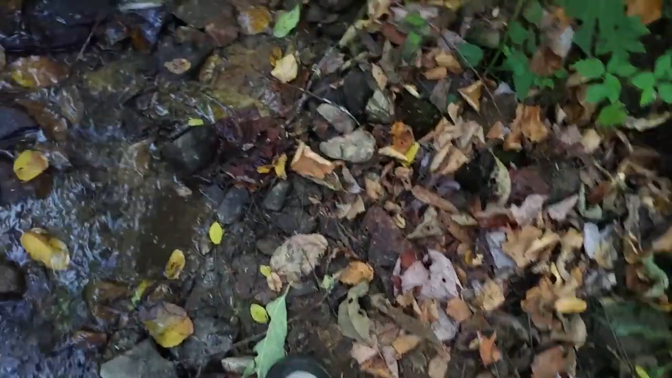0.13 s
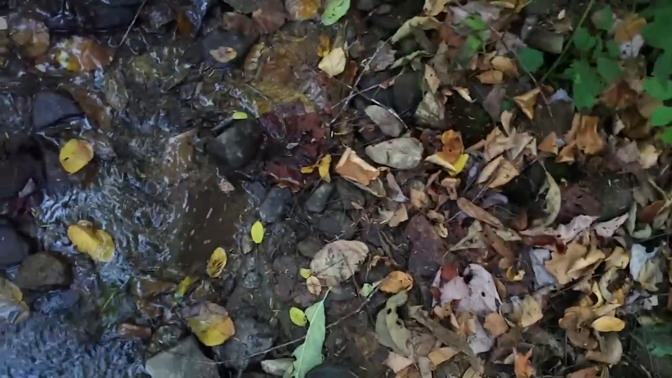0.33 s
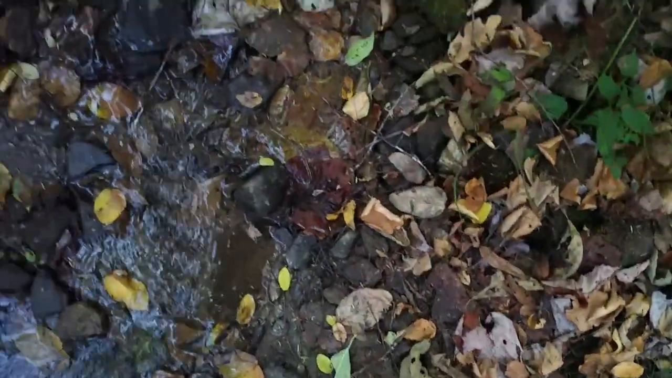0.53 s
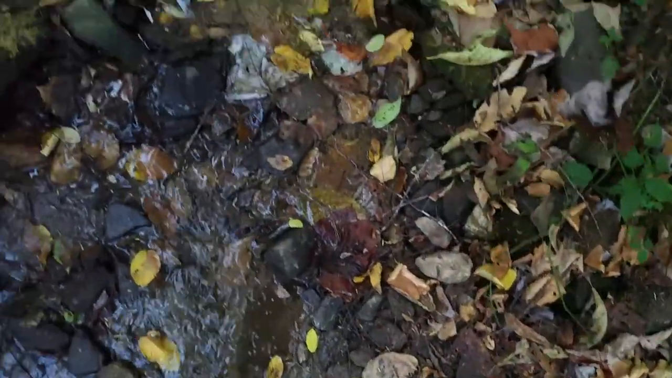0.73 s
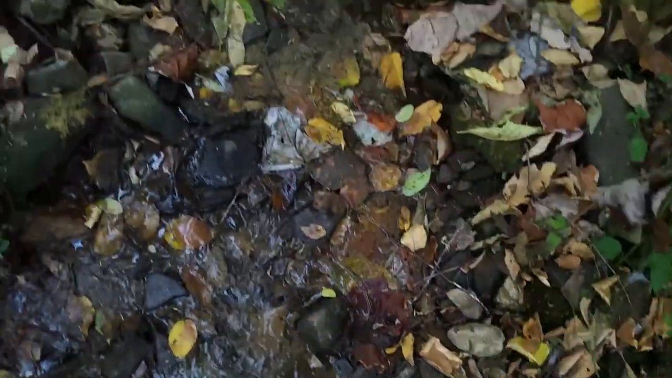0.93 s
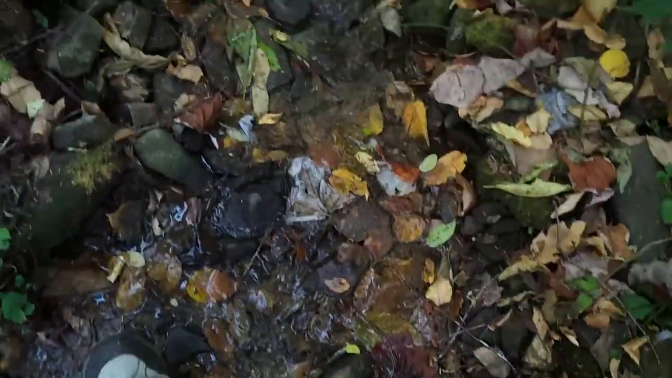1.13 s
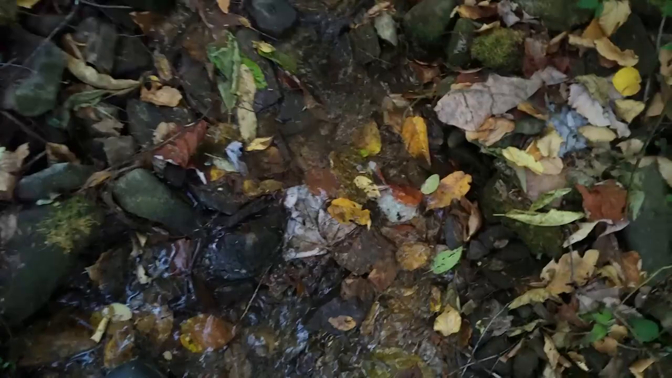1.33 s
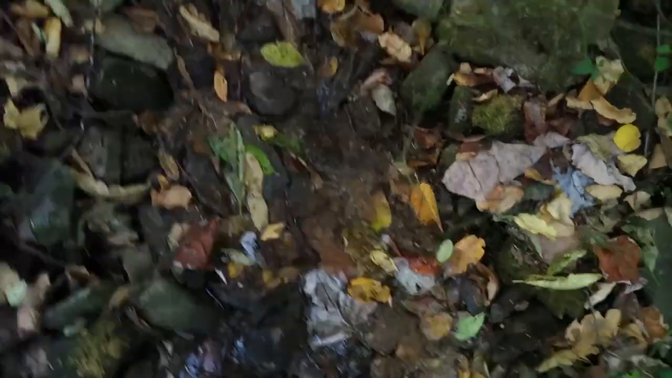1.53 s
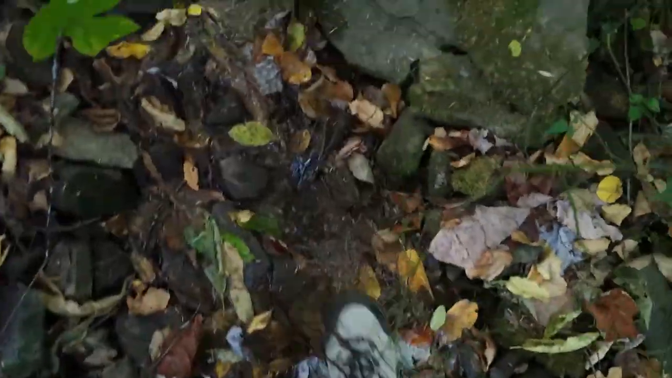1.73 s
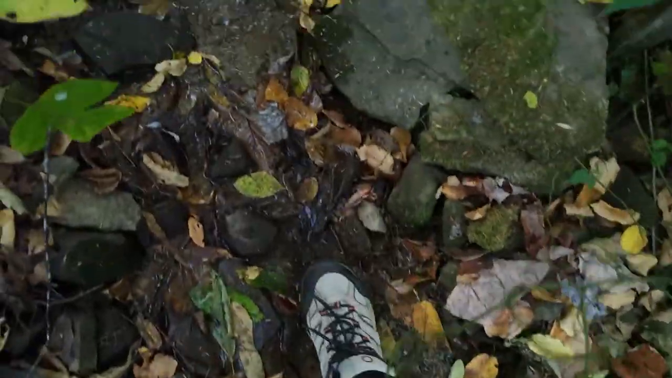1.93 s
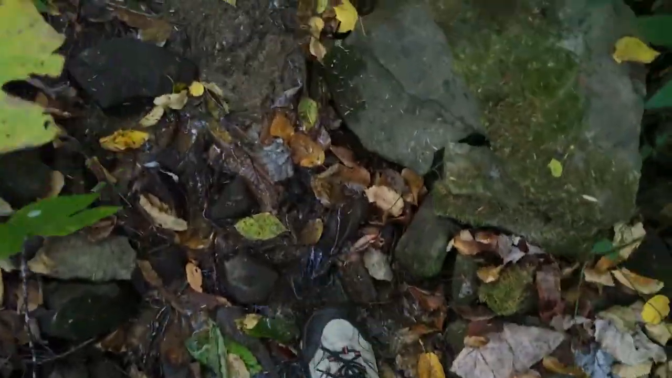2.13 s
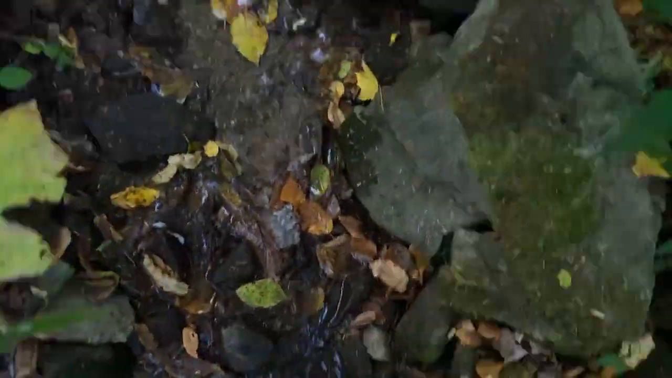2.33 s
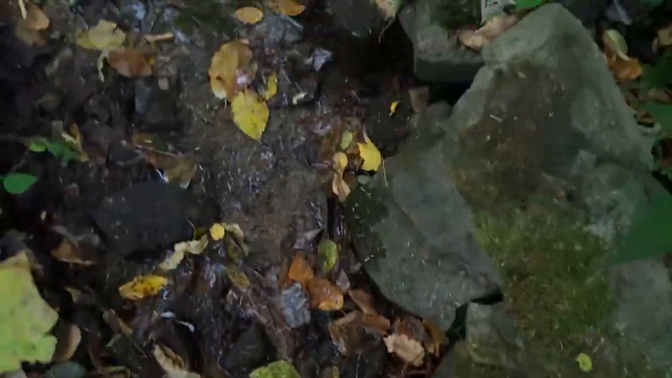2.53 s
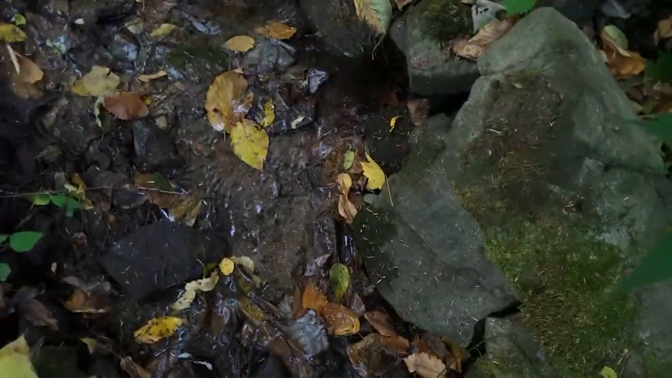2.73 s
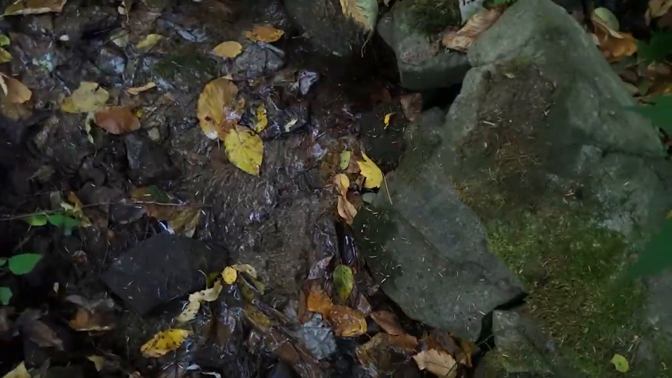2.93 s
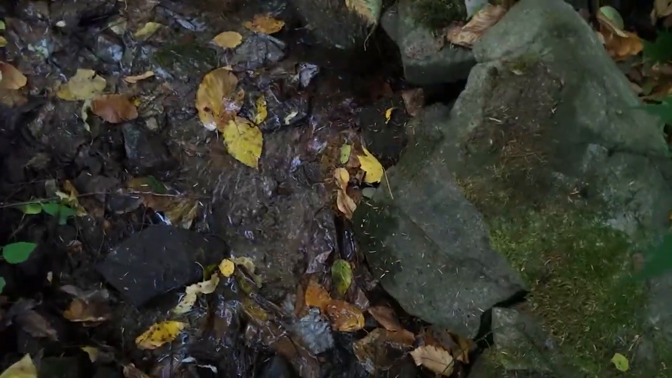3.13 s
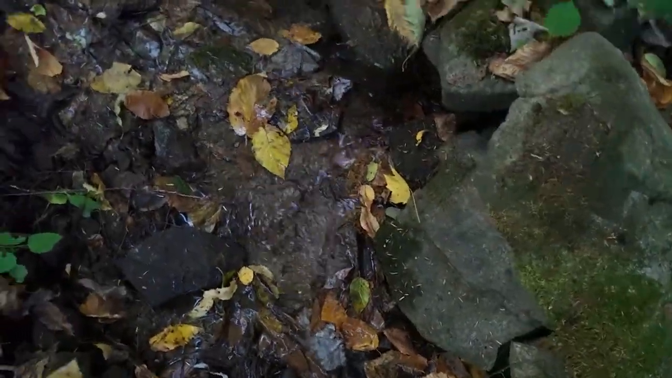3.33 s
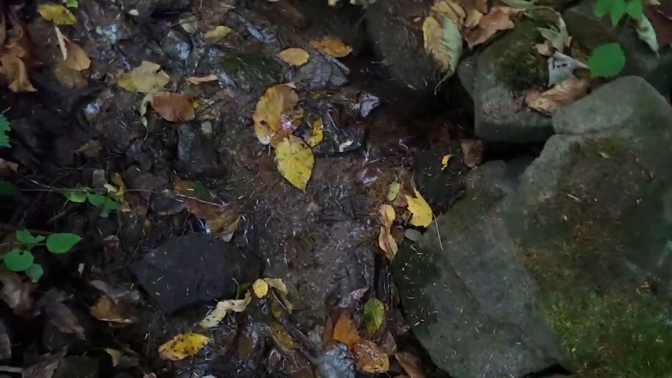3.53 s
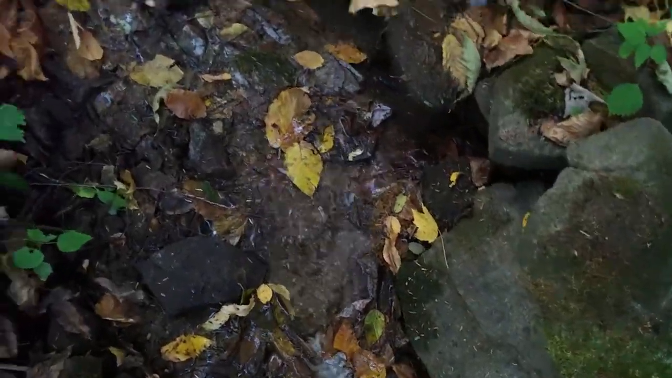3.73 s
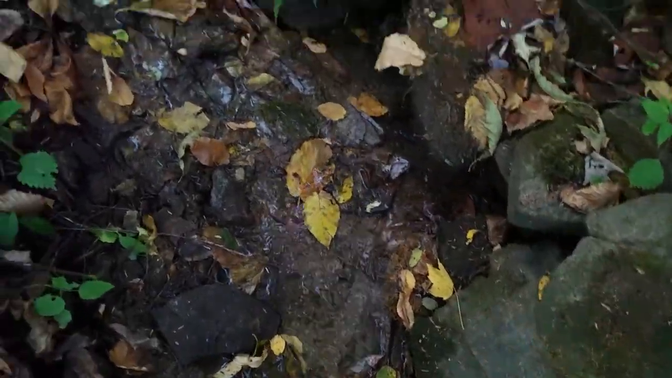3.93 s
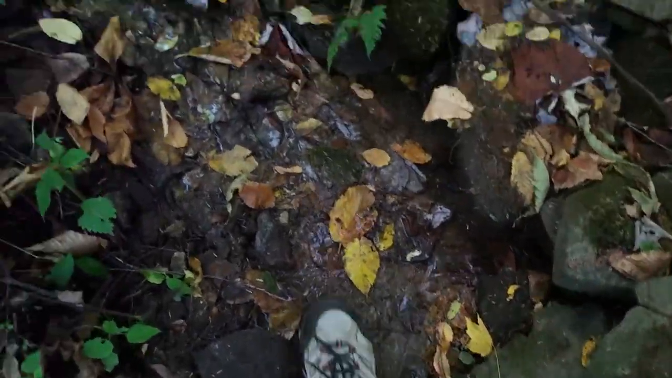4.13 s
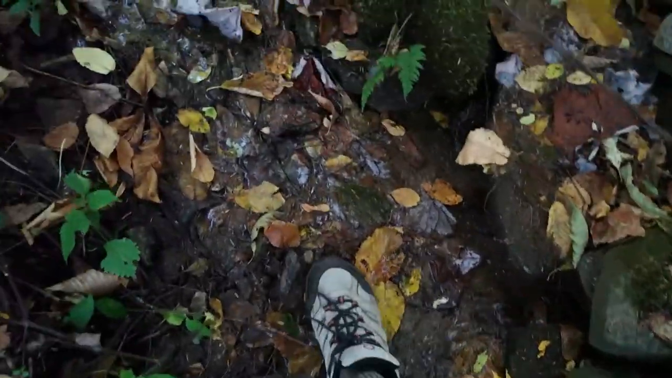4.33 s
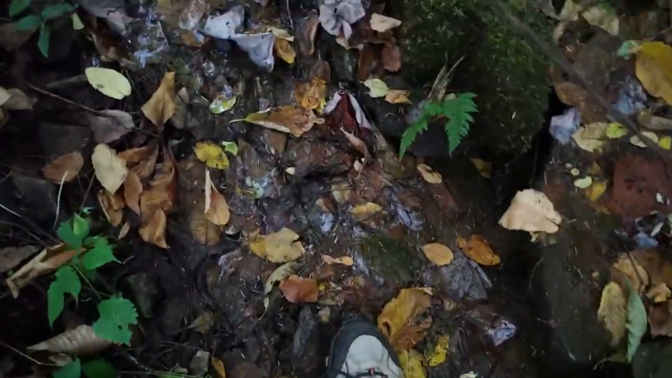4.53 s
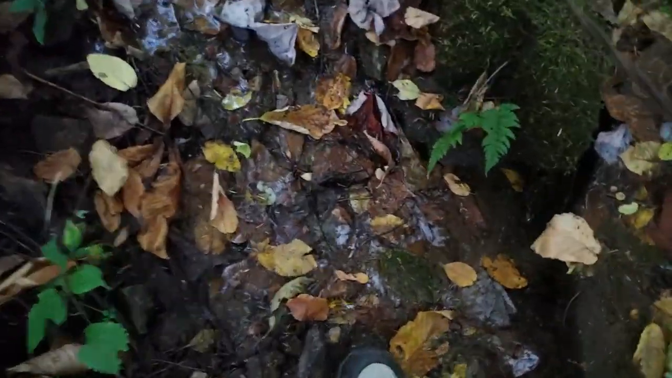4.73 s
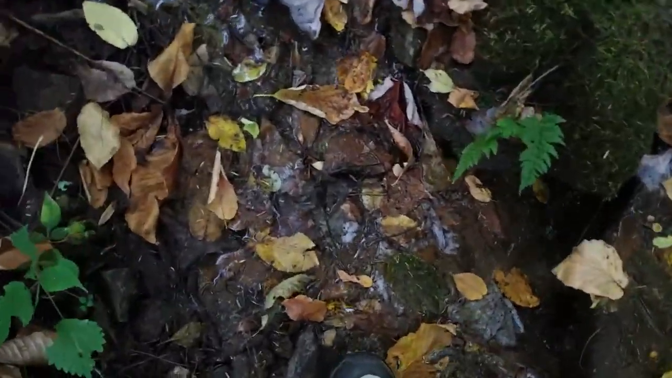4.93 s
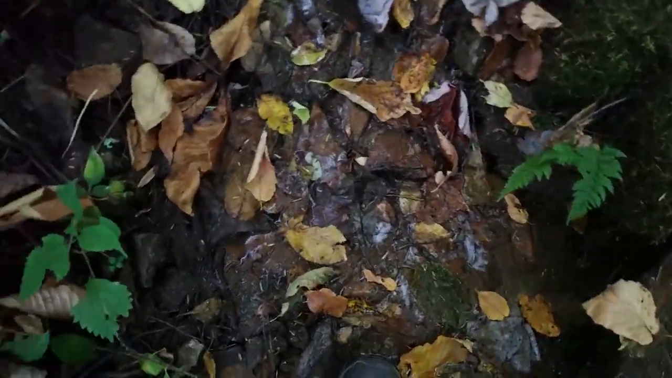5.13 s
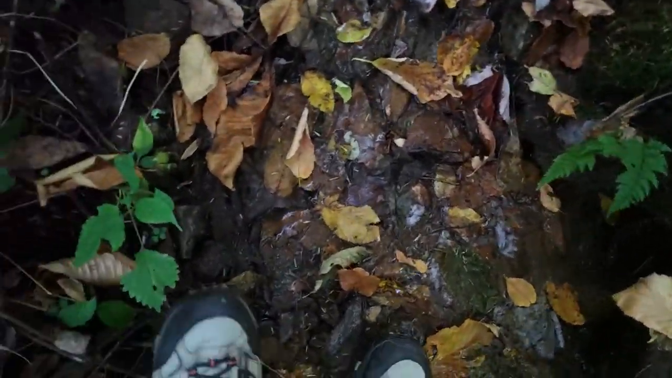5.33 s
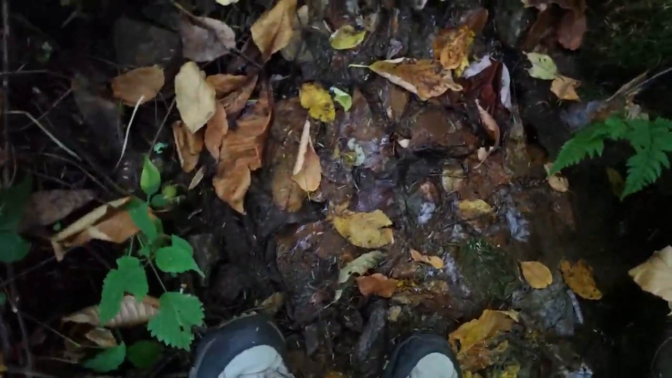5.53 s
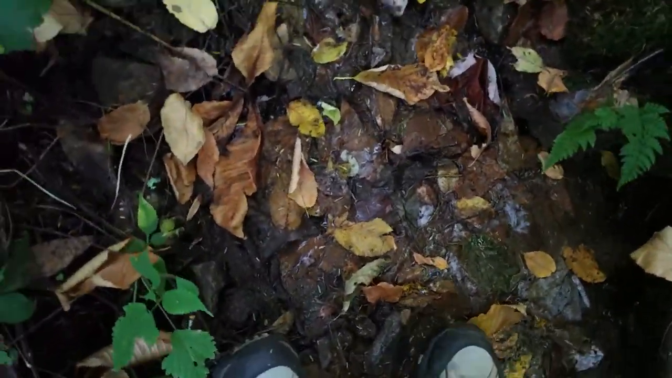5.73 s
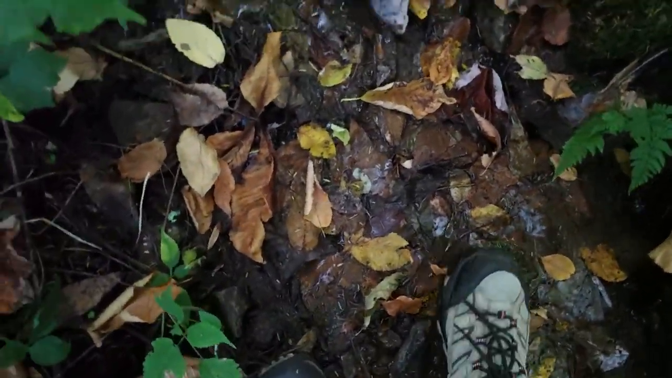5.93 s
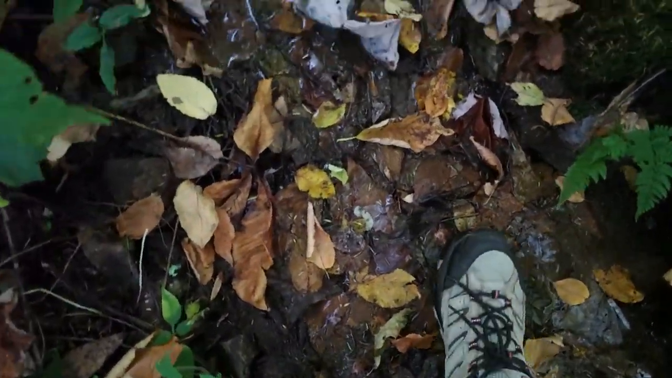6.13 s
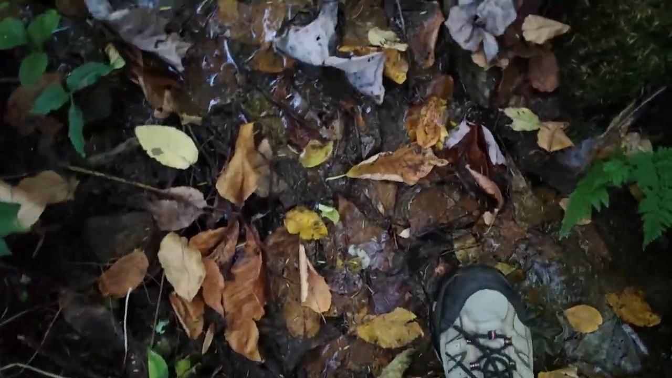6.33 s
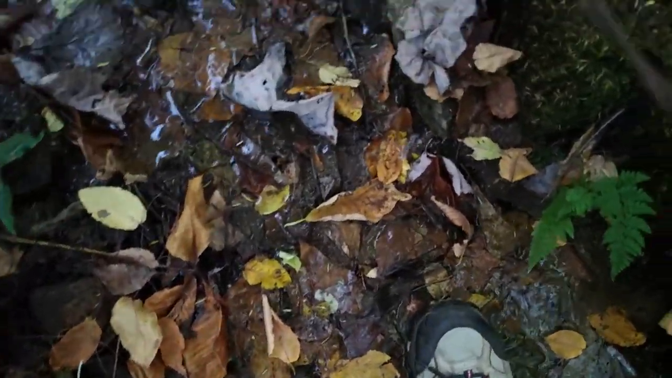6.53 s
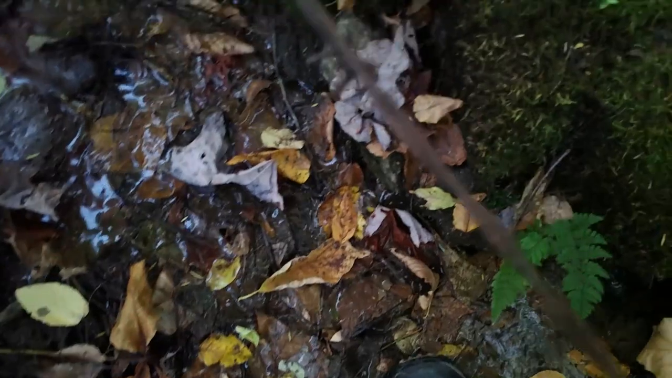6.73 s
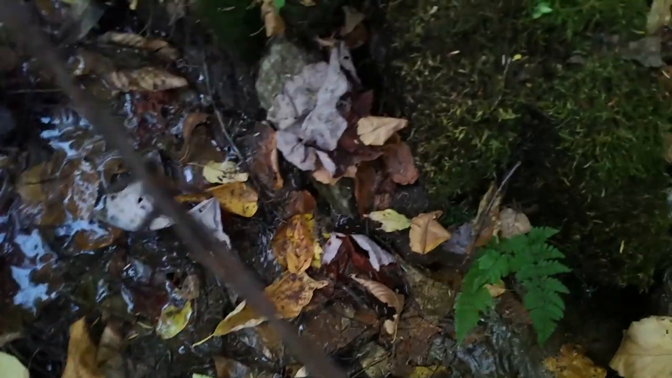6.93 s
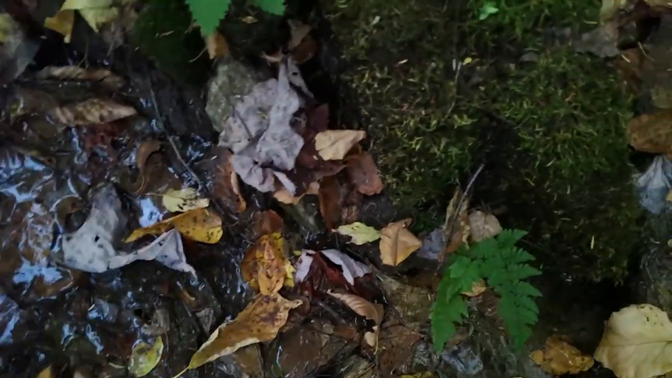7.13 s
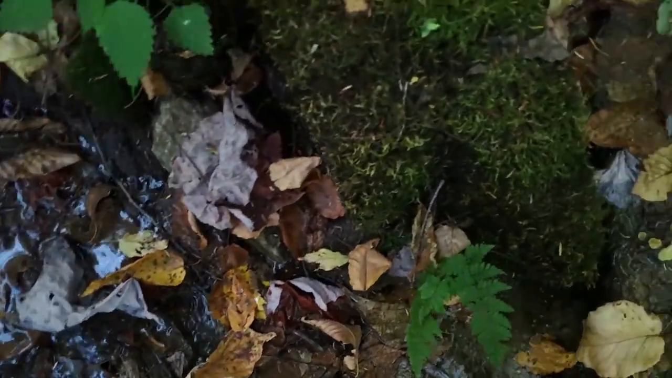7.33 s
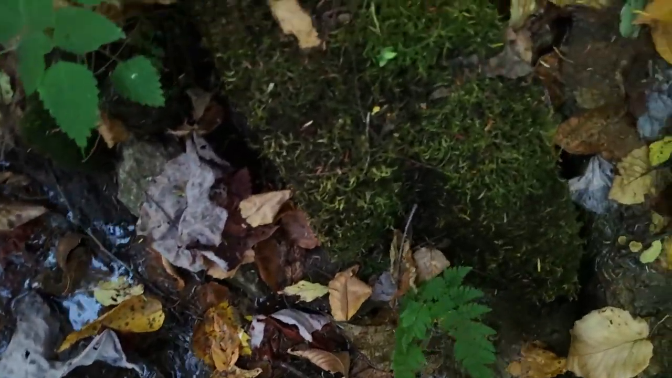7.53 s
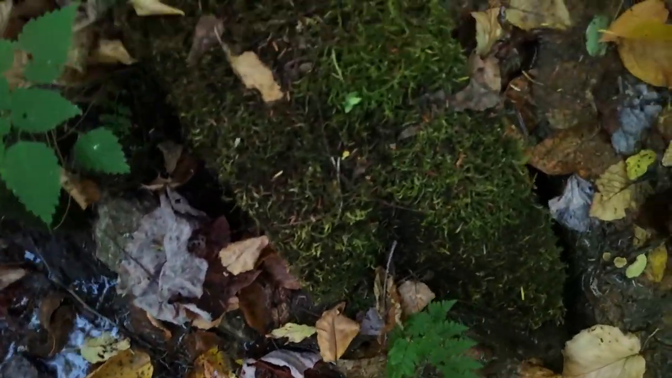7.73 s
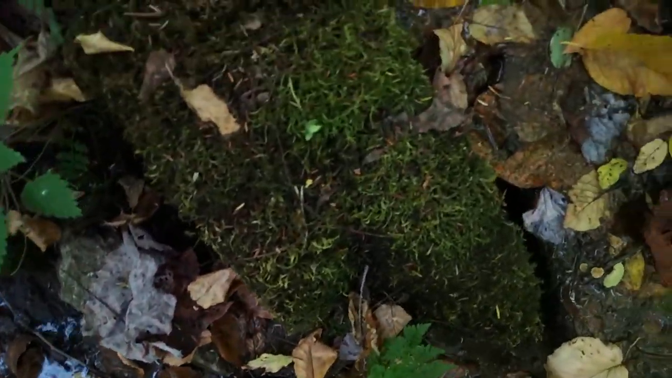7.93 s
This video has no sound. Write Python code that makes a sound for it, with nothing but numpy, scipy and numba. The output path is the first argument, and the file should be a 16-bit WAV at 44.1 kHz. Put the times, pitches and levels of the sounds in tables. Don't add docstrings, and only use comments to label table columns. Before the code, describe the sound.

Close, dry outdoor sound of careful steps on wet stones and leaves. Each step brings a gritty crunch, hard pebble clicks and crisp leaf crackles, followed by little rising water drops. Low bumps and rumble come from the hand holding the microphone, strongest early on. A faint trickle continues between steps, and the later part is quieter with settling grit, faint scrapes and one last bright crack.

```python
import sys
import numpy as np
from scipy import signal
from scipy.fft import rfft, irfft, next_fast_len
from scipy.io import wavfile
from scipy.ndimage import uniform_filter1d, map_coordinates
from numba import njit

SR = 44100
rng = np.random.default_rng(int(sys.argv[2]) if len(sys.argv) > 2 else 0)


def natural_amplitude(level_db):
    exponent = np.asarray(level_db, float) / 20
    return 10 ** exponent


def inscribe(sig):
    pcm = np.round(np.clip(np.atleast_2d(sig).T, -1, 1) * 32767)
    wavfile.write(sys.argv[1], SR, pcm.astype(np.int16))


N = 356769


def level(x, db):
    return x * natural_amplitude(db) / np.sqrt(np.mean(x ** 2))


def colour(x, points):
    size = next_fast_len(N)
    hz, db = np.transpose(points)
    bin_hz = np.arange(size // 2 + 1) * SR / size
    gain = natural_amplitude(np.interp(np.log(bin_hz + 1), np.log(hz), db))
    return irfft(rfft(x, size) * gain, size)[..., :N]


def curve(table):
    s, *columns = np.transpose(table)
    return [np.interp(np.arange(N) / SR, s, column) for column in columns]


def walk(rate):
    k = int(SR / rate)
    held = np.repeat(rng.standard_normal(N // k + 1), k)
    return 1.3 * uniform_filter1d(uniform_filter1d(held, k), k)[:N]


def swells(s, hold, db, rise_db_s, fall_db_s):
    block = 32
    since = np.arange(0, N, block) / SR - s[:, None]
    before_db = np.maximum(-since * rise_db_s, 0)
    after_db = np.maximum((since - hold[:, None]) * fall_db_s, 0)
    power = natural_amplitude(2 * (np.atleast_2d(db)[:, :, None] - before_db - after_db)).sum(axis=1)
    return np.repeat(power, block, axis=1)[:, :N]


@njit
def rings(s, hz, t60, size, side, glide, rough, rise, noise):
    out = np.zeros((2, len(noise)))
    for k in range(len(s)):
        start, step, phase = int(s[k] * SR), 2 * np.pi * hz[k] / SR, 0.
        length = t60[k] * SR
        fade, a = np.exp(-np.log(1000) / length), size[k]
        for j in range(start, min(start + int(length), len(noise))):
            phase += step * (1 + glide * (j - start) / length + rough * noise[j])
            a *= fade
            now = a * min((j - start) / (rise * length), 1.)
            out[0, j] += now * np.sin(phase)
            out[1, j] += now * side[k] * np.cos(phase)
    return out


def grains(rate, lo_hz, hi_hz, cycles, spread_db, rough, glide=0., patchy_db=0.):
    when, pitch, chance, place = rng.random((int(rate * N / SR), 4)).T
    hz = lo_hz + (hi_hz - lo_hz) * pitch
    t60 = cycles / hz
    patch = map_coordinates(rng.standard_normal((90, 14)), [89 * when, 13 * pitch], order=1)
    size = natural_amplitude(patchy_db * patch - spread_db * np.log(1 - 0.995 * chance)) / np.sqrt(t60)
    side = 5.65 * (place - 0.5)
    return rings(when * N / SR, hz, t60, size, side, glide, rough, 0.036, rng.standard_normal(N))


def burst(s, db, hz, t60, count, rough, rise, spread=0, smear=0, others_db=0, glide=0., lift=0.):
    pitch, late, place = rng.standard_normal((len(s), count, 3)).T
    others = np.arange(count)[:, None] > 0
    tone = np.clip(hz * np.exp(spread * (pitch + lift) * others), 60, 14000)
    start = s + smear * t60 * np.abs(late) * others
    rows = np.broadcast_arrays(start, tone, t60, natural_amplitude(db + others_db * others), place)
    return rings(*(np.ravel(1. * row) for row in rows), 1. * glide, rough, rise, rng.standard_normal(N))


# (frequency [Hz], density [dB per Hz])
TRICKLE = [(88, -30), (150, 4), (1240, 9.5), (2550, -9), (5600, -19), (9000, -2), (14000, -19),
           (15500, -58)]


def brook():
    each_db = -58.5
    fizz = level(colour(rng.standard_normal((2, N)), TRICKLE), each_db)
    bubbles = grains(70, 713, 4380, cycles=87.0, spread_db=4.0, rough=0.047, glide=0.2)
    return fizz + level(bubbles, each_db)


# (frequency [Hz], density [dB per Hz])
BUFFETING = [(15, -39), (25, 9), (40, -1), (59, 5.5), (166, -12.5), (220, -22), (290, -17.5), (480, -120)]
# (full level at [s], hold [s], level [dB])
JOLTS = [(0.416, 0.03, -37), (0.596, 0.17, -37.5), (1.153, 0.21, -41), (1.8, 0.7, -43), (3.19, 0.48, -53),
         (4.258, 0.023, -41), (4.704, 0.27, -50.5), (5.125, 0.036, -36.5), (5.203, 0.09, -48),
         (6.044, 0.67, -48.5), (7.13, 0.14, -49), (7.41, 0.1, -48), (7.55, 0.51, -55)]


def rumble():
    still_db, jolt_db_s, settle_db_s = -52.5, 400, 169
    puffs = colour(rng.standard_normal(N), BUFFETING) * natural_amplitude(1.36 * walk(13))
    power = natural_amplitude(2 * still_db) + swells(*np.transpose(JOLTS), jolt_db_s, settle_db_s)[0]
    return level(puffs, 0) * np.sqrt(power)


# (time [s], weight [dB], leaf cover [dB])
WEIGHT = [(0.0, -37.5, -8), (0.33, -33, -5.5), (0.61, -42, -9), (1.05, -54.5, -2.5), (1.4, -30.5, -11),
          (1.57, -52, -4.5), (2.3, -43.5, -7.5), (2.6, -54, -4.5), (3.08, -58.5, 2.5), (3.3, -39, -11),
          (3.53, -57.5, -1), (3.67, -38, -6), (4.4, -41.5, -4), (5.7, -43.5, -1), (6.0, -53, -3),
          (6.5, -46, -5.5), (7.08, -56, -2.5), (7.4, -43, -5)]
# (full weight at [s], hold [s], weight [dB], leaf cover [dB])
STEPS = [(0.19, 0.045, -30, -5.5), (0.8, 0.17, -44.5, -9), (1.34, 0.02, -25, -16), (1.433, 0.044, -31, -8),
         (1.835, 0.048, -49, -28), (2.034, 0.058, -26, -5.5), (2.142, 0.058, -27.5, -7),
         (2.735, 0.052, -46, -12), (3.17, 0.019, -42, -5), (3.732, 0.038, -37, -5),
         (4.485, 0.038, -26, -3.5), (4.683, 0.039, -30, -1.5), (5.069, 0.011, -28, -1),
         (5.451, 0.022, -24, 0.5), (5.522, 0.016, -26.5, -24), (5.748, 0.028, -37.5, -4),
         (6.26, 0.07, -44.5, -23), (6.7, 0.23, -70, 11), (7.327, 0.017, -45, 5.5),
         (7.663, 0.016, -31.5, -9)]
# (centre [s], length [ms], gravel level [dB], leaf level [dB])
CRUNCHES = [(0.298, 33, -23.5, -60), (0.364, 110, -28, -44.5), (0.435, 57, -22.5, -43),
            (0.574, 15, -30, -60), (1.08, 3.9, -29.5, -63), (1.341, 16, -24, -25), (1.876, 10, -35.5, -67),
            (2.024, 13, -25, -25.5), (2.089, 34, -25, -32), (2.238, 6.6, -18, -37), (3.205, 16, -34, -49),
            (3.757, 14, -44, -41), (3.961, 25, -33, -40), (4.156, 15, -28, -45), (4.448, 19, -21.5, -50),
            (4.485, 7.2, -12, -19.5), (4.507, 18.4, -8.5, -21.5), (4.71, 38, -19, -35.5),
            (4.924, 57, -37, -39), (5.013, 52, -36.5, -53), (5.096, 25, -20, -26), (5.226, 30, -35, -37),
            (5.473, 31, -14.5, -37), (5.57, 12, -29, -60), (5.627, 41, -22.5, -38.5), (5.688, 11, -24, -50),
            (6.065, 34, -36, -56), (6.239, 11, -32, -54), (6.369, 31, -27.5, -38.5), (7.687, 19, -20, -29),
            (7.718, 23, -31.5, -38.5), (8.06, 13, -19.5, -48)]


def pressure():
    press_db_s, lift_db_s = 554, 225
    weight_db, cover_db = curve(WEIGHT)
    s, hold, step_db, step_cover_db = np.transpose(STEPS)
    power = natural_amplitude(2 * np.array([weight_db, weight_db + cover_db]))
    power = power + swells(s, hold, [step_db, step_db + step_cover_db], press_db_s, lift_db_s)
    hollow_gain = natural_amplitude(-19) * power[0] ** (0.77 / 2)
    for centre, ms, gravel_db, leaf_db in CRUNCHES:
        near = np.arange(max(int((centre - 0.2) * SR), 0), min(int((centre + 0.2) * SR), N))
        since = (near / SR - centre) / (ms / 1000)
        bell = np.exp(-(since / np.where(since < 0, 0.32, 0.47)) ** 2)
        power[:, near] += natural_amplitude([[2 * gravel_db - 3.0], [2 * leaf_db + 8.5]]) * bell
    gravel_gain, leaf_gain = np.sqrt(power)
    return gravel_gain, leaf_gain, hollow_gain


# (frequency [Hz], density [dB per Hz])
GRAVEL = [(290, -24), (500, -8), (718, -5.5), (1070, -3), (1280, -2), (1700, 1), (2210, -0.5), (2570, -2.5),
          (4600, -8), (5600, -17), (12100, -120)]
# (frequency [Hz], density [dB per Hz])
LEAVES = [(2650, 13), (4500, -3.5), (6000, -5), (8140, -3), (13600, -11.5), (14500, -14)]


def grind():
    gravel_gain, leaf_gain, hollow_gain = pressure()
    lurch_db = 2.2 * walk(30)
    cracks = level(grains(110, 1100, 3920, cycles=8.4, spread_db=2.0, rough=0.23), -5)
    grit = level(grains(3000, 433, 4870, cycles=26, spread_db=0.5, rough=0.14, patchy_db=1.5), 0)
    wet = level(grains(160, 754, 4786, cycles=49.0, spread_db=1.6, rough=0.036, glide=0.096), -1.6)
    rustle = level(grains(4000, 4200, 14120, cycles=72, spread_db=0.6, rough=0.045, patchy_db=3.5), 0)
    snaps = level(grains(80, 4590, 11840, cycles=190, spread_db=2.5, rough=0.308), -5)
    hollow = level(grains(260, 130, 870, cycles=6.8, spread_db=2.0, rough=0.31), 0)
    gravel = level(colour(grit + wet + cracks, GRAVEL), 0)
    leaves = level(colour(rustle + snaps, LEAVES), 0)
    return gravel * gravel_gain * natural_amplitude(lurch_db) + leaves * leaf_gain * natural_amplitude(lurch_db / 2) + hollow * hollow_gain


# (time [s], peak [dB], ring [Hz])
STONES = [(0.289, -23, 1200), (0.56, -19, 1265), (1.081, -31, 1384), (1.34, -17.5, 2010),
          (1.36, -18.5, 1340), (2.094, -19, 2800), (2.985, -33, 2260), (3.199, -27, 1000),
          (3.202, -29, 4250), (3.437, -34, 2690), (3.759, -24.5, 1020), (3.956, -21, 870),
          (3.964, -19, 1007), (3.973, -17.5, 983), (4.054, -28, 1930), (4.11, -30.5, 1780),
          (4.16, -23.5, 1820), (4.617, -29, 940), (4.713, -17.5, 1655), (4.715, -15, 2850),
          (5.224, -28, 1160), (5.445, -7, 2154), (5.455, -9.5, 1330), (5.475, -4, 1305), (5.481, -8, 1620),
          (5.48, -11, 2390), (5.94, -29.5, 2150), (6.866, -35.5, 2310), (7.051, -37.5, 2000)]
# (time [s], peak [dB], ring [Hz])
MORE_STONES = [
    (1.818, -35.5, 930),
    (2.553, -38, 2540),
    (6.221, -28, 2000),
    (6.361, -25.5, 2740),
    (6.919, -37.5, 1990),
    (7.145, -36, 1430),
    (7.169, -36, 2160),
    (7.339, -34, 2260),
    (7.447, -33, 1900),
    (8.014, -38, 2270),
]
# (time [s], peak [dB], ring [Hz])
PEBBLES = [(0.104, -25, 1510), (0.805, -31.5, 2020), (0.887, -30, 2350), (2.029, -25, 2260),
           (2.097, -20, 1440), (3.142, -36, 4600), (3.377, -34.5, 4490), (3.532, -30, 2420),
           (3.602, -28, 4520), (3.753, -19.5, 924), (3.955, -29, 4540), (4.25, -21.5, 1950),
           (4.454, -17.5, 1540), (4.507, -4.5, 2740), (5.32, -26.5, 2040), (5.63, -15, 1464),
           (5.682, -17, 3540), (5.688, -22, 2100), (5.794, -29.5, 1090), (6.124, -34, 3840),
           (6.221, -37, 4640), (6.243, -35, 4480), (6.896, -31, 2260), (7.5, -32, 1310), (7.592, -32, 3500),
           (7.689, -20, 4030), (8.05, -18.5, 1046)]
# (time [s], peak [dB], ring [Hz])
CHIPS = [(0.019, -30, 2200), (0.721, -27.5, 2870), (1.08, -35, 2930), (1.338, -17, 3470), (1.84, -28, 2530),
         (2.016, -22, 2060), (2.065, -18, 3730), (3.292, -31, 2270), (4.47, -6, 2220), (4.486, -14.5, 3900),
         (4.538, -14, 2280), (4.996, -23, 2380), (5.136, -20.5, 3140), (5.489, -2.5, 1970),
         (5.532, -18, 1790), (5.731, -27, 4260), (5.896, -27, 2640), (6.064, -27.5, 2340),
         (6.241, -20, 2140), (6.372, -20, 2560), (6.533, -29.5, 2440), (6.67, -27, 2620),
         (6.942, -33, 2100), (7.109, -34, 2300), (7.145, -30.5, 3170), (8.062, -28, 3140)]


def knocks():
    s, db, hz = np.transpose(STONES + MORE_STONES + PEBBLES + CHIPS)
    counts = [len(STONES + MORE_STONES), len(PEBBLES), len(CHIPS)]
    ms = np.repeat([5.4, 3.6, 2.66], counts)
    clear = burst(s, db + 6, hz, 0.004 * ms, count=1, rough=0.06, rise=0.05)
    cluster = burst(s, db - 8.0, hz, 0.0023 * ms, count=3, spread=0.29, smear=0.14, rough=0.88,
                    rise=0.031, others_db=3.0, lift=0.66)
    return clear + cluster


def rocks(x):
    t60_s, tail_db = 0.048, -8
    t = np.arange(int(0.06 * SR)) / SR
    tail = rng.standard_normal((2, len(t))) * natural_amplitude(-60 * t / t60_s) * np.minimum(t / 0.002, 1)
    tail = tail * natural_amplitude(tail_db) / np.sqrt(np.sum(tail ** 2, axis=1, keepdims=True))
    return x + signal.fftconvolve(x, tail, axes=1)[:, :N]


# (time [s], peak [dB], pitch [Hz])
THUDS = [(0.175, -35, 543), (1.079, -35, 492), (1.34, -27.5, 590), (1.618, -27.5, 105), (2.233, -32, 630),
         (3.576, -33.5, 320), (4.5, -29, 484), (5.089, -25.5, 270), (5.452, -22, 523), (5.625, -30.5, 135),
         (7.411, -31.5, 165), (7.453, -37, 181)]


def thuds():
    s, db, hz = np.transpose(THUDS)
    return burst(s, db - 0.5, hz, 0.0346, count=8, spread=0.18, smear=0.148, rough=0.5,
                 rise=0.024, others_db=-0.5)


# (time [s], peak [dB], ring [Hz])
DROPS = [(0.347, -18, 1940), (0.492, -18, 1730), (0.622, -23.5, 1510), (0.701, -19, 2650),
         (0.773, -29, 1140), (0.793, -28, 1960), (0.827, -24.5, 1920), (1.183, -26, 1460),
         (1.677, -24.5, 1200), (1.696, -27, 2530), (1.877, -26.5, 886), (1.947, -27, 2090),
         (1.995, -25, 1940), (2.296, -24, 2350), (2.506, -30, 1390), (2.719, -30, 1210), (2.772, -31, 2610),
         (3.218, -37, 2120), (3.315, -21, 2100), (3.345, -23, 4180), (3.4, -33, 1990), (3.544, -23, 1940),
         (3.789, -23, 2300), (3.92, -21.5, 2980), (3.991, -22, 980), (4.002, -18.5, 1180),
         (4.082, -28, 2570), (4.318, -22, 2230), (4.664, -29, 1010), (4.758, -23, 1330), (4.828, -21, 3540),
         (4.858, -22.5, 1500), (5.174, -25, 2130), (5.212, -22, 2630), (5.28, -24, 834), (5.387, -26, 2200),
         (5.416, -25, 2190), (5.796, -15, 2810), (6.002, -28.5, 1660), (6.264, -17, 1850),
         (6.286, -26, 3250), (6.473, -22.5, 1910), (6.572, -25, 3420), (6.647, -25, 2350),
         (6.678, -28, 2980), (6.804, -32, 2360), (7.239, -24.5, 2610), (7.287, -25, 2520),
         (7.322, -29, 2350),
         (5.74, -23, 1110),
    (5.815, -23.5, 2690),
    (6.248, -20, 1930),
    (7.421, -39, 2180),
    (7.533, -29, 1700),
    (7.571, -34, 2190),
    (7.591, -25, 2100),
    (7.614, -20.5, 2500),
    (7.782, -18.5, 1660),
    (8.086, -28, 865),
]


def drops():
    s, db, hz = np.transpose(DROPS)
    ring = burst(s, db - 10.5, hz, 0.033, count=1, rough=0.06, rise=0.021, glide=0.14)
    tick = burst(s, db - 8.0, hz, 0.008, count=4, spread=0.363, smear=0.1, rough=0.4,
                 rise=0.041, others_db=-3.0, lift=1.0)
    return ring + tick


# (time [s], peak [dB], centre [Hz])
CLICKS = [(0.368, -12.5, 1400), (0.58, -12, 2180), (1.457, -17.5, 950), (1.494, -21, 1500),
          (1.582, -23, 2300), (1.603, -17.5, 2380), (1.611, -25, 3000), (1.623, -15, 2480),
          (1.65, -24, 2700), (2.137, -17, 2900), (2.16, -13, 2000), (2.183, -17, 2300), (2.192, -20, 2500),
          (2.233, -0.5, 1470), (2.258, -19, 2500), (3.579, -28, 2500), (4.149, -17, 1780),
          (4.278, -25, 2300), (5.456, -9, 1400), (5.466, -5, 1800), (7.684, -4, 6000), (7.925, -26, 2100),
          (7.98, -24, 1800), (8.049, -10.5, 1140)]
# (pitch ratio [1], level [dB])
GRIT_MODES = [(0.78, -7.5), (1.02, 0), (1.5, -3.5), (2.2, -13)]


def clicks():
    cycles = 9
    s, db, hz = np.transpose(CLICKS)
    ratio, mode_db = np.transpose(GRIT_MODES)[:, :, None]
    side = rng.standard_normal(len(s))
    rows = np.broadcast_arrays(s, hz * ratio, cycles / hz, natural_amplitude(db + mode_db), side)
    return rings(*(np.ravel(row) for row in rows), 0., 0.1, 0.023, rng.standard_normal(N))


# (start [s], length [s], pitch [Hz], level [dB])
SCRAPES = [(0.404, 0.053, 260, -47.5), (2.299, 0.18, 3460, -54.5), (2.427, 0.18, 4300, -61.5),
           (7.739, 0.3, 3850, -53), (2.709, 0.053, 236, -52), (3.19, 0.035, 4400, -43.5),
           (3.658, 0.3, 4540, -50.5), (4.887, 0.067, 1510, -32.5), (5.744, 0.043, 216, -49),
           (6.405, 0.6, 799, -57), (6.899, 0.78, 705, -56.5), (7.096, 0.21, 121, -54.5),
           (7.148, 0.92, 2215, -51.5), (7.3, 0.82, 2870, -53.5), (7.499, 0.57, 1510, -58),
           (7.5, 0.53, 123, -57.5)]


def scrapes():
    s, length, hz, db = np.transpose(SCRAPES)
    when, pitch, place, force = rng.random((len(s), 80, 4)).T
    t60 = 45 / hz
    pulse = natural_amplitude(db - 3.0 * (np.log(1 - force) + 1.5))
    size = pulse * np.sin(np.pi * when) ** 0.5 * np.sqrt(length / t60)
    tone = hz + np.minimum(hz / 3, 380) * (pitch - 0.5)
    rows = np.broadcast_arrays(s + length * when, tone, t60, size, place - 0.5)
    return rings(*(np.ravel(row) for row in rows), 0., 0.04, 0.016, rng.standard_normal(N))


# (time [s], peak [dB], pitch [Hz])
WOBBLES = [
    (0.565, -30.5, 62),
    (0.64, -25, 54),
    (0.725, -28, 77.6),
    (0.785, -30.5, 52),
    (0.915, -34.5, 58),
    (1.452, -28, 68),
    (5.46, -29, 72.6),
]


def wobbles():
    s, db, hz = np.transpose(WOBBLES)
    return burst(s, db + 2.0, hz, 22 / hz, count=1, rough=0, rise=0.038, glide=-0.42)[0]


# (time [s], peak [dB], centre [Hz])
TICKS = [(0.647, -30.5, 6530), (0.99, -27, 5170), (1.079, -32.5, 6200), (1.339, -12, 8230),
         (1.604, -32, 5300), (1.622, -23, 4900), (1.641, -19.5, 5300), (2.082, -9.5, 6800),
         (2.104, -12, 7340), (2.182, -16.5, 5000), (2.213, -16.5, 8750), (2.234, -12.5, 8850),
         (3.921, -29.5, 6200), (4.447, -22.5, 7550), (4.471, -17, 9100), (4.481, -10.5, 7870),
         (4.503, -7, 7600), (4.512, -5.5, 7700), (4.993, -21, 8600), (5.099, -17, 12450),
         (5.216, -19, 10600), (5.734, -25, 5300), (6.265, -25, 8000), (6.337, -24.5, 7460),
         (6.359, -25, 10530), (6.612, -25, 8730), (7.289, -30.5, 8760), (7.684, -4, 6660),
         (8.05, -23, 5540), (8.061, -25, 6900)]


def ticks():
    s, db, hz = np.transpose(TICKS)
    return burst(s, db + 3.0, hz, 0.0065, count=8, spread=0.203, smear=0.18, rough=0.23,
                 rise=0.084, others_db=-6.5)


# (time [s], peak [dB], centre [Hz])
FLECKS = [(0.7008, -29, 5670), (0.7632, -31, 8520), (0.8036, -27.5, 5830), (0.8864, -29, 5630),
          (0.904, -24.5, 5280), (0.9294, -30, 5250), (1.1473, -29, 5960), (1.6751, -31, 9470),
          (1.714, -31, 6290), (1.7729, -28, 13600), (1.7963, -27, 4640), (2.258, -17, 4900),
          (2.5471, -33, 6000), (2.6229, -29, 5680), (3.0353, -27, 8650), (3.3144, -26, 9800),
          (3.3438, -33, 4600), (3.357, -25, 4620), (3.3777, -25, 4940), (3.5299, -34, 4740),
          (3.601, -24, 4540), (3.689, -24, 7600), (3.8094, -22, 7950), (3.8292, -28, 7170),
          (4.137, -26, 5630), (4.2787, -23.5, 4640), (4.7711, -19.5, 6100), (4.8663, -23, 6800),
          (5.0215, -21, 7770), (5.1342, -20, 5850), (5.4146, -22, 7460), (5.4405, -12, 7300),
          (5.6027, -24, 4720), (5.7114, -30, 4650), (5.796, -34, 4600), (5.8521, -30, 7430),
          (5.9249, -30, 10100),
          (6.1235, -31, 7500), (6.1584, -34, 10000), (6.5021, -29, 7940), (6.543, -24.5, 8900),
            (6.6872, -33, 13500), (6.7118, -28, 5030), (6.725, -24, 7510), (6.758, -25, 8400),
            (6.796, -33, 10800), (6.8626, -26, 6980), (6.8882, -23, 9500), (6.9044, -29, 4770),
            (6.9506, -31, 5850), (7.013, -26, 4900), (7.1057, -29.5, 6000), (7.235, -23.5, 6070),
            (7.267, -23, 5920), (7.3123, -36, 5870), (7.328, -20, 5850), (7.3687, -22, 5660),
            (7.444, -29, 9790), (7.5058, -26, 4830), (7.868, -28, 7300), (7.9883, -25, 4700),
            (8.0202, -35, 7990)]


def flecks():
    s, db, hz = np.transpose(FLECKS)
    return burst(s, db - 5.5, hz, 0.0085, count=7, spread=0.22, smear=0.4, rough=0.12,
                 rise=0.12, others_db=-6, lift=0.8)


def squeak():
    s, db, hz = np.array([5.225]), -14, 1900
    return burst(s, db, hz, 0.04, count=1, rough=0.12, rise=0.09, glide=3.2)


# (frequency [Hz], side minus mid [dB])
PORTS = [(2500, -67), (4300, -39), (6500, -11.5), (15000, -8.5)]


def scene():
    soft = brook() + grind() + thuds() + scrapes()
    sharp = knocks() + drops() + clicks() + ticks() + flecks() + squeak()
    mid, side = soft + rocks(sharp)
    mid = mid + rumble() + wobbles()
    side = colour(side, PORTS)
    return np.array([mid + side, mid - side])


def low_pass(x):
    return signal.sosfilt(signal.butter(12, 15610, fs=SR, output="sos"), x)


# (frequency [Hz], gain [dB])
MIC = [(22, -36), (42, -1), (14300, 0), (14600, -28)]


def record(dry):
    mix = np.clip(colour(dry, MIC), -1, 1)
    return low_pass(mix)


dry = scene()
out = record(dry)
inscribe(out)
```